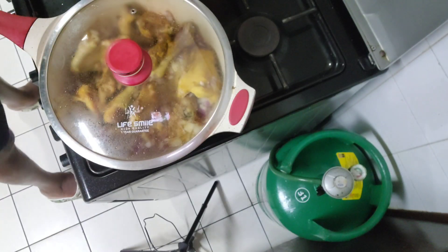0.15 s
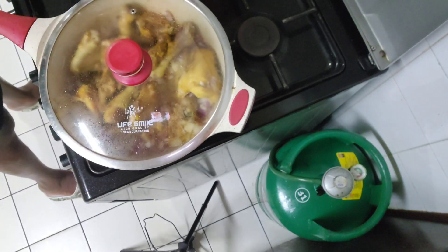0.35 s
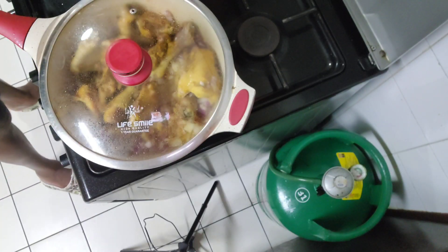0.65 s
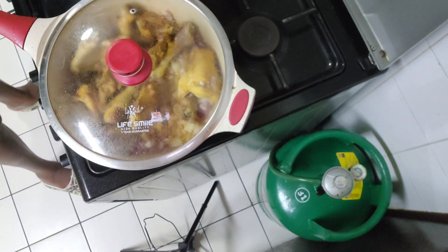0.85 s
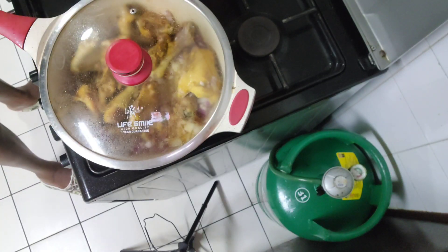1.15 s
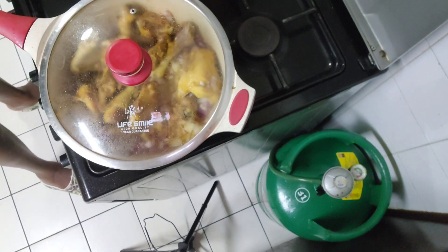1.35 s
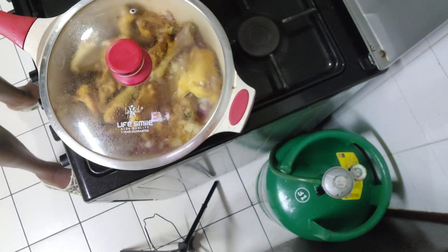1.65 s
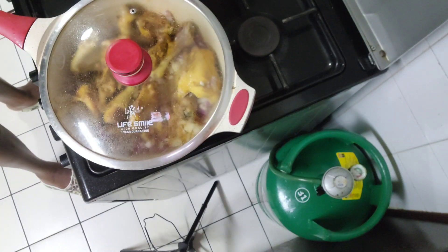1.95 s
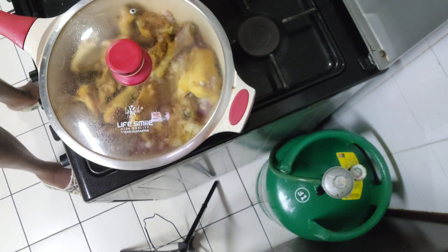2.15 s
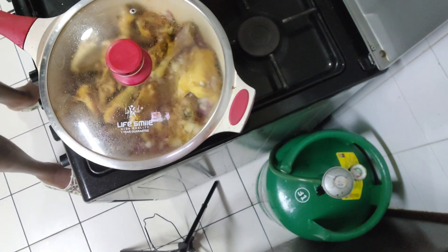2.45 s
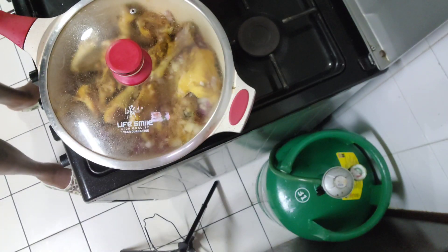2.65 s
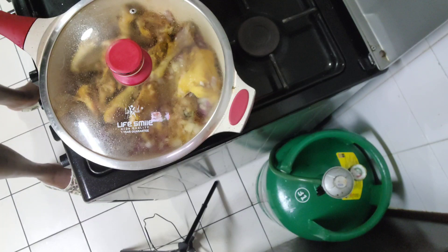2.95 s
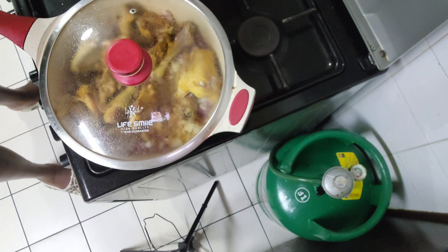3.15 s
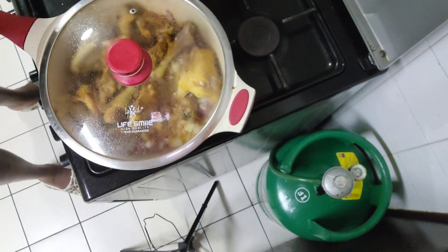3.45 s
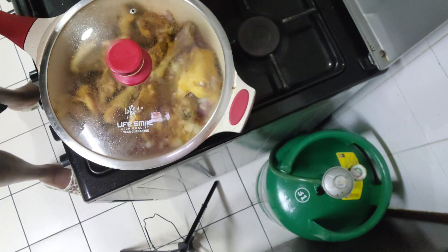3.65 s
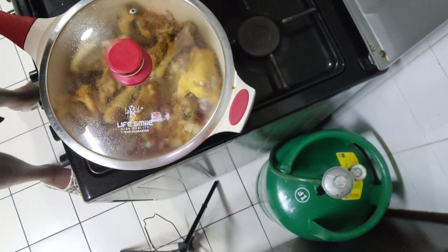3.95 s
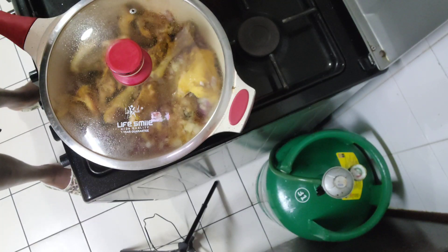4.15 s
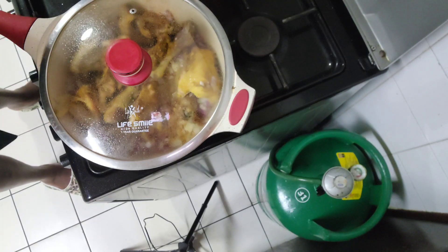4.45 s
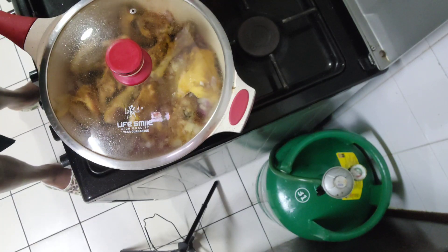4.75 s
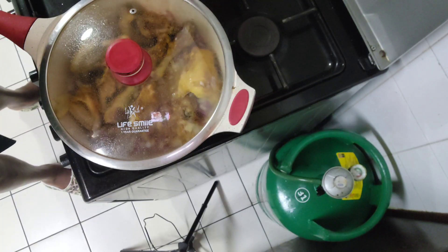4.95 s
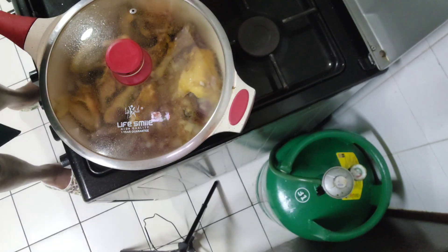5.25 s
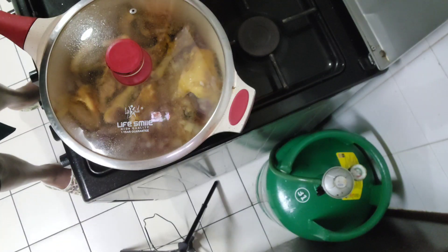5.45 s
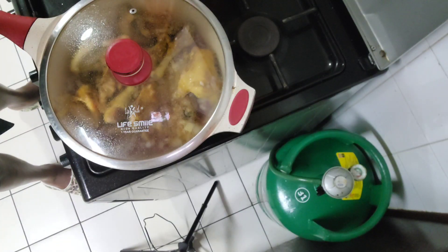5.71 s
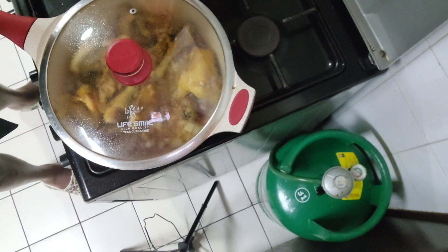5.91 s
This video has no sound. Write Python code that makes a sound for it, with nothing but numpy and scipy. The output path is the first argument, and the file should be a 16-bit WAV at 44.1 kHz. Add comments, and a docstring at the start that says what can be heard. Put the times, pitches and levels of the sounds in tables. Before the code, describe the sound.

Chicken sizzles softly in a covered pan in a small kitchen, with one soft bump and a light double clack on the stove.

```python
"""Chicken frying softly under a glass lid, to one side of a stereo microphone in a small tiled kitchen.
Juice boils in the hot fat as countless tiny steam bursts and bubbles, coloured by the air under the lid;
trapped pockets of it hiss, and a few drops of fat spit. Early on something bumps the stove softly, then
taps it with a light double clack that rings its metal and hollow body.
Behind the pan the tiles answer, and a low drone and a faint motor hum fill the room."""
import sys
import numpy as np
from scipy import signal
from scipy.fft import rfft, irfft, next_fast_len
from scipy.io import wavfile
from scipy.ndimage import map_coordinates

SR = 44100
rng = np.random.default_rng(int(sys.argv[2]) if len(sys.argv) > 2 else 0)


def to_wav(s):
    """Save 16-bit WAV."""
    ch = np.atleast_2d(s).T  # columns
    pcm = np.round(np.clip(ch, -1, 1) * 32767)  # PCM
    wavfile.write(sys.argv[1], SR, pcm.astype(np.int16))


N = 267995


def amp(db):
    """Decibels to gain."""
    return np.exp(np.asarray(db) * np.log(10) / 20)


def unit(x):
    """Scale to rms 1."""
    return x / np.sqrt(np.mean(x ** 2) + 1e-20)


def along(points, hz):
    """Read (f/Hz, value) points on a log frequency axis."""
    f, v = np.transpose(points)
    return np.interp(np.log(hz + 1), np.log(f + 1), v)


def wobble(rate):
    """A smooth random curve, rate knots a second."""
    at = np.linspace(0, N * rate / SR, N // 100)
    knots = rng.standard_normal(int(at[-1]) + 4)
    return np.interp(np.arange(N) * rate / SR, at, map_coordinates(knots, [at]))


def filtered(x, response):
    """Pass x through a frequency response."""
    n = x.shape[-1]
    m = next_fast_len(n + 8192)
    return irfft(rfft(x, m) * response(np.fft.rfftfreq(m, 1 / SR)), m)[..., :n]


def add(track, s, sound):
    """Mix a sound in at s seconds."""
    part = track[:, round(s * SR):][:, :sound.shape[1]]
    part += sound[:, :part.shape[1]]


# Likeness of the microphone's two ports: f/Hz, correlation
PORT_LIKENESS = [(60, .988), (150, .98), (350, .85), (850, .72), (1300, .4), (1560, .65), (1750, .38),
                 (2500, .58), (3000, .4), (3700, .45), (4400, .62), (4900, .35), (7450, .35), (9000, .1),
                 (15000, .03)]
# Lead of the left port over the right: f/Hz, phase/rad
PORT_LEAD = [(800, 0), (1150, -.7), (1420, 1.5), (1490, 1.5), (1560, 2.6), (1720, .7), (2550, .4),
             (2900, -1.6), (3700, 2.3), (4000, 5.2), (4550, 8.9), (4900, 8.2), (5250, 5.1), (5750, 2),
             (6400, 0), (7450, -4.8), (8300, -6.3)]


def stereo(pair, colour):
    """Two unrelated signals become the left and right ports, at rms 1; colour gives dB by frequency."""
    turn = lambda hz: np.arccos(np.clip(along(PORT_LIKENESS, hz), -1, 1)) / 2
    mid, side = filtered(pair, lambda hz: amp(colour(hz)) * [np.cos(turn(hz)), np.sin(turn(hz))])
    lead = lambda hz: np.exp(1j * np.outer([1, -1], along(PORT_LEAD, hz)) / 2)
    return unit(filtered(np.array([mid + side, mid - side]), lead))


def noise(spectrum, size):
    """Noise of a given spectrum at the two ports."""
    return stereo(rng.standard_normal((2, size)), lambda hz: along(spectrum, hz))


# Room tone of the kitchen: f/Hz, relative level/dB
ROOM_TONE = [(20, -5), (35, -5), (65, 9.5), (100, 4), (150, 0.5), (200, -7), (300, -10), (400, -11),
             (500, -22.5), (900, -13), (3000, -31.5)]
# Motor hum in the background: f/Hz, rms level/dB, unsteadiness (0-1)
MOTOR_HUM = [(43.5, -64, 1), (60.15, -53.5, 0.04), (86.5, -69, 0.56), (147.4, -69, 0.7), (230, -82.5, 0.4),
             (283, -97, 0.84), (387.3, -76.5, 0.17), (536, -81, 1)]


def drone():
    """Low room noise lies under the unsteady hum lines of a motor."""
    phase = 2 * np.pi * np.arange(N) / SR
    hum = np.zeros(N)
    for hz, db, shake in MOTOR_HUM:
        line = (1 + shake * wobble(9)) * np.sin(hz * phase)
        drift = shake * wobble(9) * np.cos(hz * phase)
        hum += amp(db) * unit(line + drift)
    return hum + amp(-55.5) * noise(ROOM_TONE, N)


# Reverberation of the tiled room: f/Hz, t60/s
ROOM_DECAY = [(150, 0.68), (1000, 0.38), (5000, 0.44), (15000, 0.019)]


def kitchen(x):
    """Tiled walls answer, the treble dying first; the bass is alike at both ports."""
    hz, t, bands = signal.stft(rng.standard_normal((2, SR // 2)), SR, nperseg=256)
    decay = amp(-60 * t / along(ROOM_DECAY, hz)[:, None])
    tail = stereo(signal.istft(bands * decay, SR, nperseg=256)[1], np.zeros_like)
    return signal.fftconvolve(x, tail / np.linalg.norm(tail[0]), axes=1)[:, :N]


def ring(modes, t, scatter_db, spread):
    """Modes struck once decay; level and phase (spread, in radians) scatter between the ports."""
    out = np.zeros((2, len(t)))
    for hz, db, t60 in modes:
        fade = amp(db + scatter_db * rng.standard_normal((2, 1)) - 60 * t / t60)
        phase = rng.uniform(0, 2 * np.pi) + spread * rng.standard_normal((2, 1))
        out += fade * np.sin(2 * np.pi * hz * t + phase)
    return out


def sustained(hits, modes, spread):
    """Modes kept ringing by (t/s, level/dB) contacts: each adds energy to what is still sounding."""
    t = np.arange(SR) / SR
    start = hits[0][0]
    ages = [(np.maximum(t + start - s, 0), db) for s, db in hits]
    out = np.zeros((2, len(t)))
    for hz, level, t60 in modes:
        energy = sum((amp(db - 60 * age / t60) * (1 - np.exp(-age * hz / 2))) ** 2 for age, db in ages)
        phase = rng.uniform(0, 2 * np.pi) + spread * rng.standard_normal((2, 1))
        out += amp(level) * np.sqrt(energy) * np.sin(2 * np.pi * hz * t + phase)
    return out


# First light touch on the stove: t/s, level/dB
FIRST_TOUCH = (1.314, -38.5)
# Its short ring: f/Hz, relative level/dB, t60/s
TOUCH_MODES = [(515, -9.5, .23), (555, -14, .14), (925, 0, .055)]
# Dull bumps on the stove: t/s, thud level/dB, body level/dB
STOVE_BUMPS = [(1.317, -47.5, -62), (1.33, -57, -54), (1.357, -51.5, -58), (1.385, -58, -55),
               (1.518, -40.5, -46), (1.535, -43.5, -43), (1.548, -41, -37), (1.569, -42, -40.5),
               (1.589, -45, -39.5), (1.645, -54, -54), (1.695, -48, -50), (1.715, -53, -50),
               (1.74, -54, -54), (1.78, -56, -54), (1.83, -57, -57)]
# Spectrum of a thud: f/Hz, relative level/dB
THUD_SPECTRUM = [(25, -30), (50, -6), (100, -3), (200, 3), (330, -.5), (450, -5), (560, -2), (730, -10),
                 (950, -16), (1400, -28), (4000, -45)]
# Hollow body of the stove: f/Hz, relative level/dB, t60/s
BODY_MODES = [(95, -8, .25), (146, -9, .36), (184, -4, .16), (227, 0, .15), (297, -12, .2), (366, -21, .12),
              (508, -19, .2), (552, -14, .18), (651, -20, .18), (1040, -20, .14)]


def bumps():
    """A light touch, then soft contacts that thud and set the hollow stove body ringing."""
    out, t = np.zeros((2, N)), np.arange(SR // 4) / SR
    attack = 1 - np.exp(-t / .002)
    touch_s, touch_db = FIRST_TOUCH
    add(out, touch_s, amp(touch_db) * attack * ring(TOUCH_MODES, t, scatter_db=1, spread=.3))
    for s, thud_db, _ in STOVE_BUMPS:
        add(out, s, attack * amp(thud_db - 60 * t / .14) * noise(THUD_SPECTRUM, len(t)))
    body_hits = [(s, db) for s, _, db in STOVE_BUMPS]
    add(out, body_hits[0][0], sustained(body_hits, BODY_MODES, spread=.15))
    return out


# Hard contacts on the stove: t/s, relative level/dB
TAP_CONTACTS = [(1.521, -41), (1.53, -42), (1.5378, -31), (1.5426, -20), (1.549, -30), (1.556, -31),
                (1.562, -32), (1.568, -33), (1.574, -24), (1.578, -22), (1.582, -24.5), (1.587, -29.5),
                (1.592, -30), (1.597, -34), (1.611, -37), (1.631, -39)]
# Spectrum of one contact: f/Hz, relative level/dB
CRACK_SPECTRUM = [(300, -35), (1100, -2.5), (1400, -3), (1750, -7), (2100, -1), (2350, -6), (2700, 1),
                  (3200, -1), (4300, 3.5), (5300, 3), (6300, 3), (6800, -1), (7600, 4), (8250, -13),
                  (9100, -4.5), (12000, -4), (16000, -14)]
# Ring of the tapped metal: f/Hz, relative level/dB, t60/s
METAL_MODES = [(1250, -19, .07), (2110, -8, .05), (2690, -17, .18), (3533, -13.5, .14), (4187, -10, .1),
               (4715, -11, .13), (4871, -12, .14), (5096, -10.5, .23), (5230, -14.5, .17),
               (5906, -14.5, .14), (6240, -11, .09), (6992, -11, .07), (7324, -6, .055), (7465, 2, .06),
               (7600, -3, .04)]


def tap():
    """A rattle of hard contacts: each is a brief crack that leaves the metal ringing."""
    out, t = np.zeros((2, N)), np.arange(SR // 4) / SR
    attack = 1 - np.exp(-t / .001)
    for s, db in TAP_CONTACTS:
        crack = amp(-3.4 - 60 * t / .044) * noise(CRACK_SPECTRUM, len(t))
        add(out, s, amp(db) * crack * attack)
    add(out, TAP_CONTACTS[0][0], amp(-14.5) * sustained(TAP_CONTACTS, METAL_MODES, spread=.8))
    return out


def bursts(rate, size_db, life, side_db=0):
    """Tiny steam bursts, rate a second: many small, few large, each falling 60 dB in life seconds."""
    born = rng.random(N) < rate / SR
    excess = np.minimum(rng.exponential(size=N), 5)
    size = born * amp(size_db * excess + side_db * rng.standard_normal((2, N)))
    power = signal.lfilter([1], [1, -amp(-60 / (life * SR)) ** 2], size ** 2)
    return unit(np.sqrt(power) * rng.standard_normal((2, N)))


def bubbles(rate, low_hz, high_hz, life, size_db):
    """Each bubble pings at its own pitch in one of two channels; life is the mean t60 in seconds."""
    when, pitch, length, size, channel = rng.random((int(rate * N / SR), 5)).T[:, :, None]
    t = np.arange(SR // 50) / SR
    hz = low_hz + (high_hz - low_hz) * pitch
    level_db = -size_db * np.log(np.maximum(size, np.exp(-4)))
    taper = 1 - (t / t[-1]) ** 2  # closes every ping within 20 ms
    fade = amp(level_db - 60 * t / (life * (.5 + length))) * taper
    pings = fade * np.sin(2 * np.pi * hz * t)
    at = (when * (N - len(t))).astype(int) + N * (channel > .5) + np.arange(len(t))
    return unit(np.bincount(at.ravel(), pings.ravel(), 2 * N).reshape(2, N))


def around(pitch, share):
    """Colour in dB of a resonance, 6 dB down at a share of its pitch to either side."""
    return lambda hz: -20 * np.log10(1 + ((hz - pitch) / (share * pitch)) ** 2)


# Resonances of the air under the lid: f/Hz, width/Hz, boost/dB
LID_RESONANCES = [(890, 29, 4.5), (1033, 52, 9.5), (1172, 82, 6.5), (1421, 53, 10), (1488, 59, 10.5),
                  (1675, 84, 7.5), (1994, 54, 10), (2612, 79, 8.5), (3127, 260, 6.5), (4115, 260, 5.5),
                  (5290, 400, 6), (6480, 110, 3), (7380, 580, 7.5)]


def under_lid(spectrum):
    """Colour in dB of a sound inside the covered pan, heard from outside."""
    return lambda hz: along(spectrum, hz) + sum(
        db / (1 + (2 * (hz - centre) / width) ** 2) for centre, width, db in LID_RESONANCES)


# Pockets of juice in the pan: peak t/s, half length/s, level/dB, f/Hz
JUICE_POCKETS = [(0.19, 0.27, -52, 4940), (.46, 0.28, -57.5, 3100), (1.72, 0.073, -56, 2730)]


def pockets():
    """Trapped juice boils off in a run of bursts, all near one pitch, that swells and fades."""
    out, t = np.zeros((2, N)), np.arange(N) / SR
    run = bursts(rate=900, size_db=1.2, life=.05, side_db=1)
    for s, half, db, pitch in JUICE_POCKETS:
        swell = np.exp(-((t - s) / half) ** 2)
        out += amp(db) * swell * stereo(run, around(pitch, share=.091))
    return out


def stray_spits(rate=2.5, db=-43, scatter_db=2, low_hz=2620, high_hz=12100):
    """Faint spits at random moments, rate a second: rows of t/s, relative level/dB, f/Hz."""
    draws = rng.random((int(rate * N / SR), 3))
    return [(when * N / SR, db + scatter_db * (2 * size - 1), low_hz * (high_hz / low_hz) ** pitch)
            for when, size, pitch in draws]


# Loudest spits of fat under the lid: t/s, relative level/dB, f/Hz
FAT_SPITS = [(1.047, -37, 4300), (1.252, -33.5, 6600), (2.355, -36, 11500), (2.5334, -35.5, 4200),
             (3.162, -33, 5290), (3.284, -33, 4250), (4.154, -33, 4300), (4.49, -41, 3400),
             (4.89, -38.5, 3000), (5.252, -42, 2950), (5.8, -42, 2620)]


def spits():
    """Larger drops burst with a tick around their own pitch and a short hiss."""
    out, t = np.zeros((2, N)), np.arange(SR // 8) / SR
    attack = 1 - np.exp(-t / .00059)
    puff = lambda colour: stereo(rng.standard_normal((2, len(t))), colour)
    for s, db, pitch in FAT_SPITS + stray_spits():
        tick = amp(-6.5 - 60 * t / .044) * puff(around(pitch, share=.067))
        hiss = amp(-13.5 - 60 * t / .15) * puff(under_lid(SIZZLE_SPECTRUM))
        add(out, s, amp(db) * (tick + hiss) * attack)
    return out


def patchy(x, depth_db):
    """Bubbling moves about the pan, so bands swell and sink on their own."""
    bands = signal.stft(x, nperseg=512)[2]
    patch = np.outer(np.hanning(9), np.hanning(15))  # bands by frames
    field = signal.fftconvolve(rng.standard_normal(bands.shape[1:]), patch, 'same')
    return unit(signal.istft(bands * amp(depth_db * unit(field)), nperseg=512)[1][:, :N])


# Juice running into the hot fat: peak t/s, half length/s, sizzle rise/dB, fizz rise/dB
JUICE_SURGES = [(.68, 0.23, 1, 3), (1.07, .06, 1.3, 3.2), (1.35, .15, .8, 1), (2.057, 0.14, 1, 1.5),
                (2.318, 0.099, -1, 2.6), (2.584, 0.06, 1.8, 1.3), (3.1, 0.34, 1.6, 1.8),
                (3.28, 0.036, 1.3, .6), (3.87, 0.042, 3.2, 1.2), (4.643, 0.22, 1.7, 1.5),
                (5.568, 0.07, 1.5, 1.2)]


def liveliness(settle_db=2.5, settle_s=3.0):
    """Rise in dB of sizzle and fizz: the sizzle slowly settles, and both follow each surge of juice."""
    t = np.arange(N) / SR
    coarse, fine = settle_db * np.exp(-t / settle_s), np.zeros(N)
    for s, half, coarse_db, fine_db in JUICE_SURGES:
        swell = np.exp(-((t - s) / half) ** 2)
        coarse += coarse_db * swell
        fine += fine_db * swell
    return coarse, fine


# The pan's three voices (coarse bursts, finest bursts, simmering juice): f/Hz, relative level/dB
SIZZLE_SPECTRUM = [(600, -29), (1500, -16.5), (2250, -17), (2500, -9.5), (2900, -8), (3600, -5),
                   (4500, -0.5), (6200, -1), (7500, -6), (8300, -14), (11000, -8.5), (16000, -9)]
FIZZ_SPECTRUM = [(3000, -30), (7000, -12), (8200, -5), (9100, -1.5), (9900, -3), (11300, 0), (13000, 0),
                 (13900, -1), (14600, .5), (15700, -3.5)]
SIMMER_SPECTRUM = [(250, -21), (570, -6.5), (820, -2.5), (1250, -7), (1750, -6.5), (2250, -15),
                   (2700, -16.5), (3500, -16)]


def frying(sizzle_db=-49.5, fizz_db=-50, simmer_db=-56.5):
    """Juice boils in hot fat in flurries: coarse bursts sizzle, the finest fizz, low ones simmer."""
    coarse_db, fine_db = liveliness()
    flurry_db = .3 * wobble(9.9) + .55 * wobble(28)

    puffs = bursts(rate=1900, size_db=1.4, life=.042)
    pings = amp(-12.5) * bubbles(rate=600, low_hz=2600, high_hz=7800, life=.035, size_db=1.8)
    coarse = stereo(puffs + pings, under_lid(SIZZLE_SPECTRUM))
    sizzle = amp(sizzle_db + coarse_db + flurry_db) * patchy(coarse, depth_db=1.25)

    fine = stereo(bursts(rate=3200, size_db=2.0, life=.032), lambda hz: along(FIZZ_SPECTRUM, hz))
    fizz = amp(fizz_db + fine_db + .9 * flurry_db) * patchy(fine, depth_db=1.5)

    juice = bursts(rate=380, size_db=1.0, life=.12, side_db=3.5)
    plops = amp(-6) * bubbles(rate=1100, low_hz=700, high_hz=3400, life=.05, size_db=1.7)
    low = stereo(juice + plops, under_lid(SIMMER_SPECTRUM))
    simmer = amp(simmer_db + .2 * coarse_db + .82 * flurry_db) * low
    return sizzle + fizz + simmer


# Balance of the pan at the microphone: f/Hz, left minus right/dB
PAN_BALANCE = [(100, -36), (600, -1), (830, -2), (1100, 3.5), (1450, 7), (1750, 0.5), (2000, 2), (2600, 1),
               (3100, -4), (4600, 1), (5600, -1), (6300, -1.5), (7400, -2.5), (8600, 4), (10000, 5),
               (12000, 0), (14200, 2.5)]


def scene():
    """The pan is off to one side, a different colour at each port, and near enough to top the walls."""
    off_axis = lambda hz: amp(np.outer([1, -1], along(PAN_BALANCE, hz)) / 2)
    pan = filtered(frying() + pockets() + spits(), off_axis)
    stove = pan + tap() + bumps()
    walls = amp(-9) * kitchen(stove)
    return stove + walls + drone()


def record(dry):
    """The recorder keeps nothing above its band limit."""
    return filtered(dry, lambda hz: hz < 15750)


dry = scene()
out = record(dry)
to_wav(out)
```